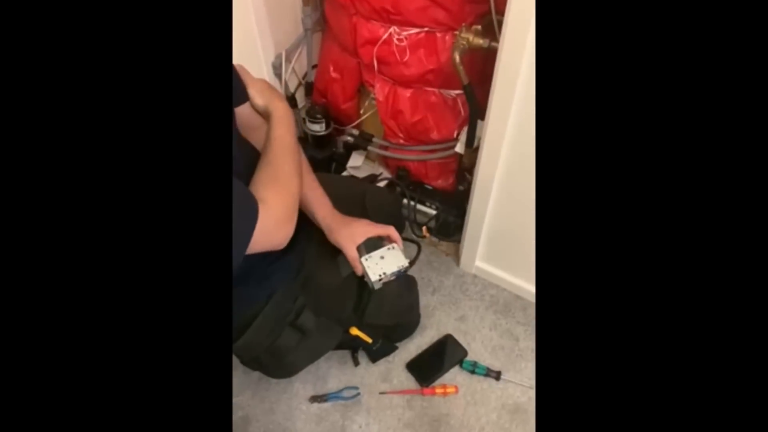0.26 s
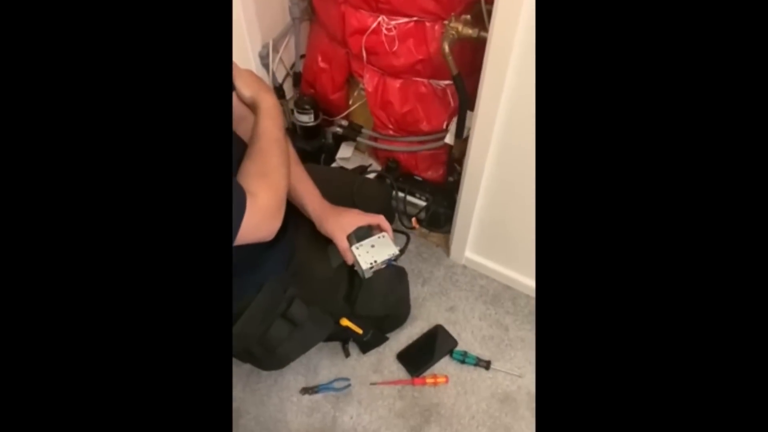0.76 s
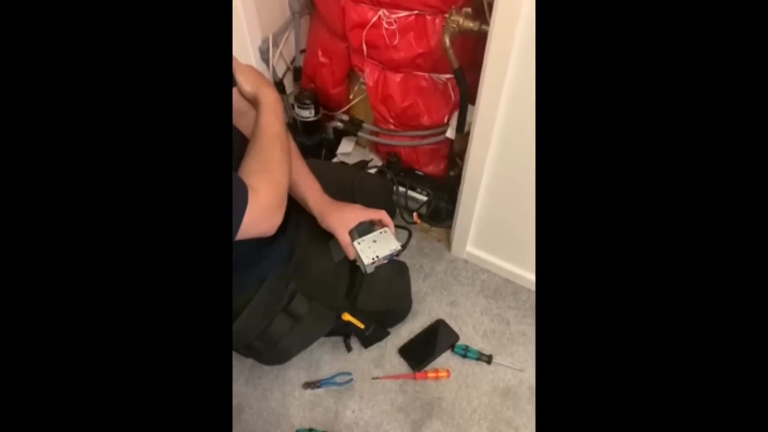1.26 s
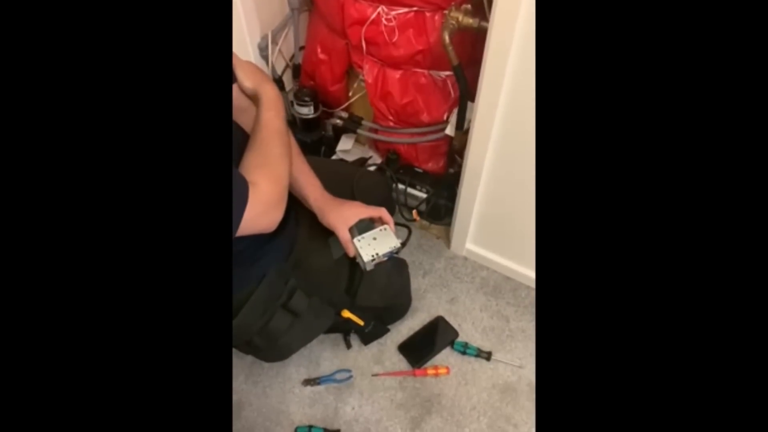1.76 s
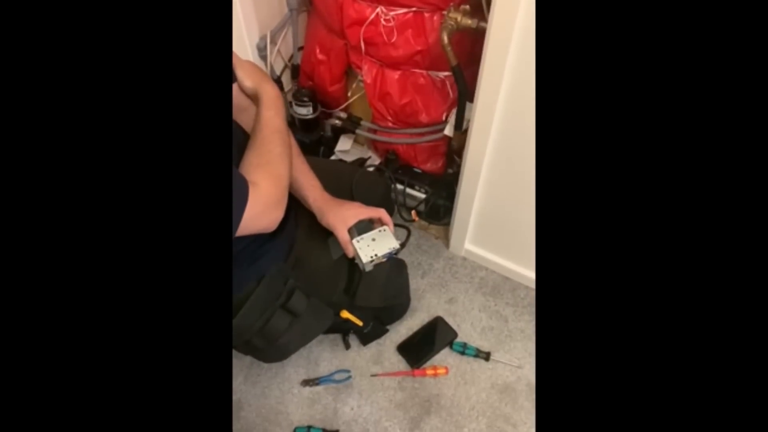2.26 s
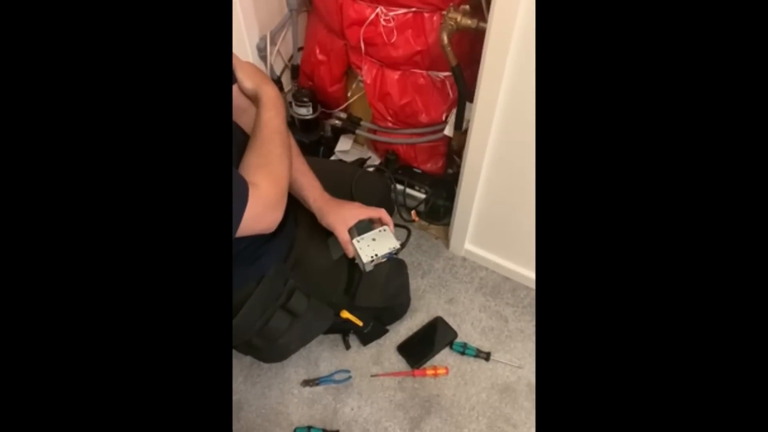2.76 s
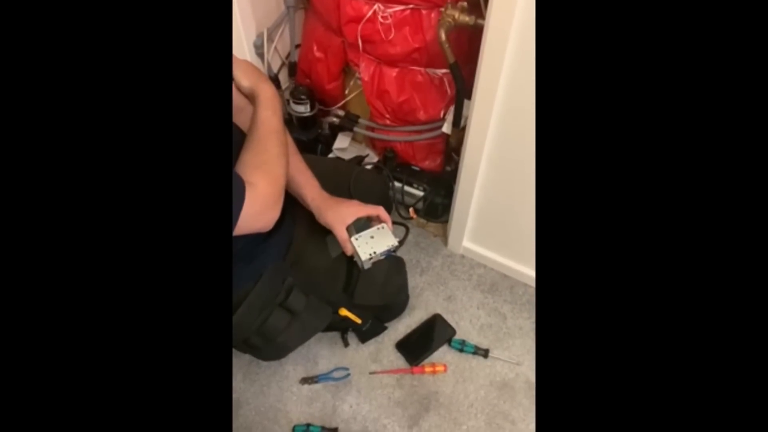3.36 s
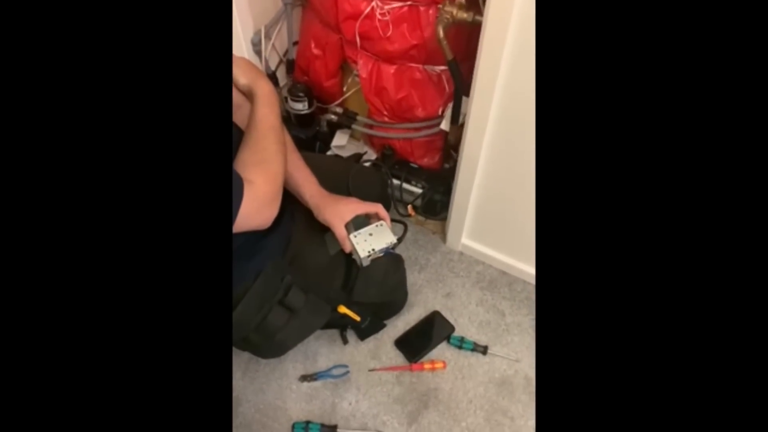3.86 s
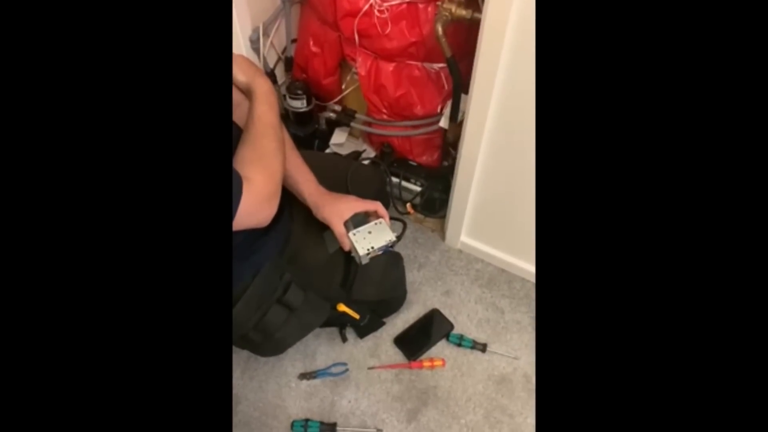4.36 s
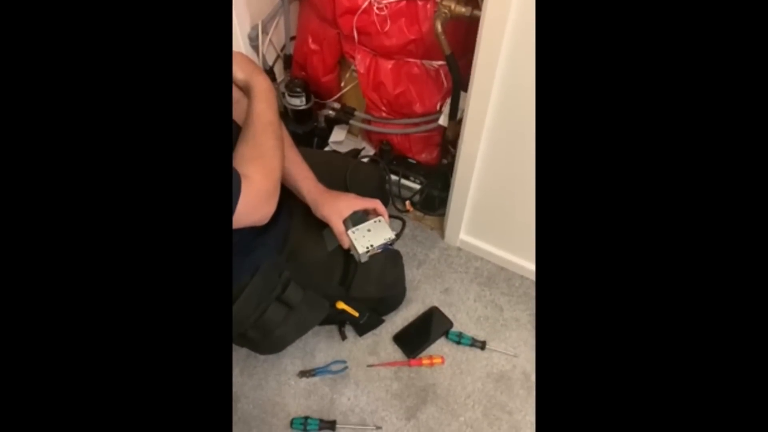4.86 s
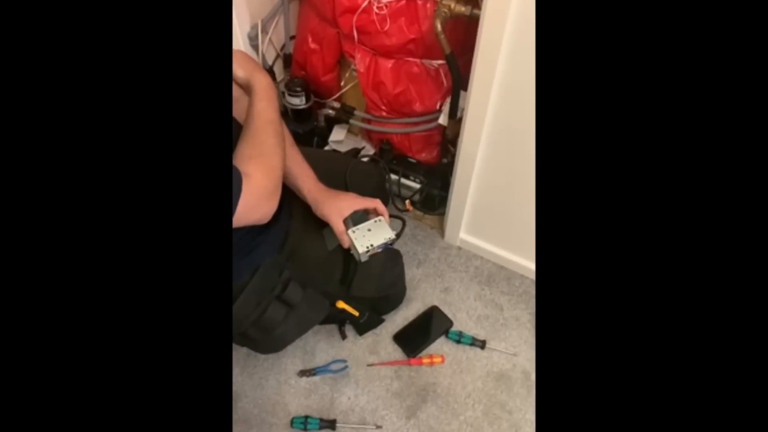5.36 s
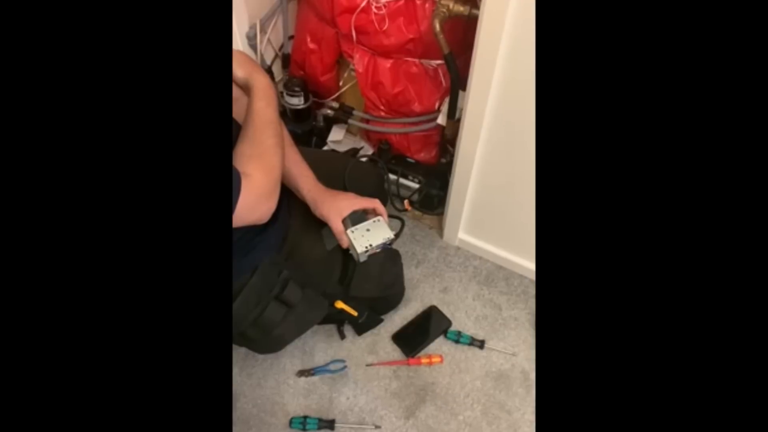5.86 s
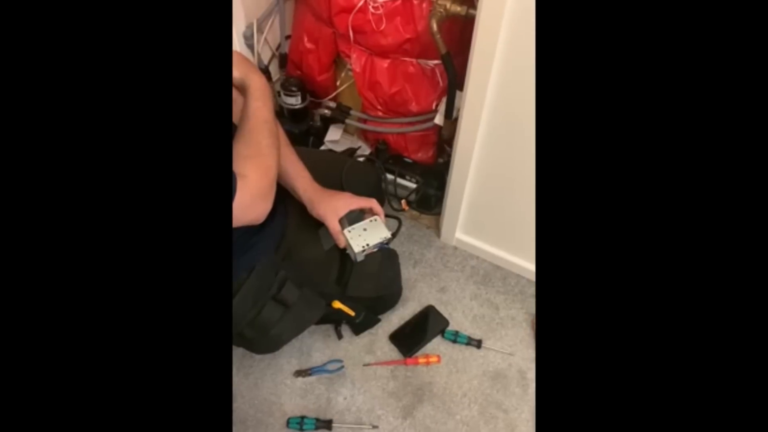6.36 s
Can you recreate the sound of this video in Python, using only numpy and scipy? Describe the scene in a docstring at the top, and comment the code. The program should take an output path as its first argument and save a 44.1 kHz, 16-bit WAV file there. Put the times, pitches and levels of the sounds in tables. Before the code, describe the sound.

Throughout about 6.7 seconds, a small faulty mains motor in a handheld valve head gives a faint, steady, buzzy whine, strongest around 2 to 3 kilohertz, with fine gear rubbing and hiss fluttering rapidly at a hundred pulses a second. Beneath it lies a soft, low indoor rumble, rising very slightly. Sharp, loud clicks come at about 0.45, 1.66, 2.88, 4.1, 5.27 and 6.52 seconds: each a tooth slipping with a millisecond-short bright crack, then a tight, hard casing ring that dies almost immediately. They are nearly alike, the last two a little quieter. Quick early reflections and a short tail of about a quarter second show a small carpeted space. Around 3.2 seconds a very soft, dull nudge of the hand on the casing is barely noticeable. Close stereo pickup, slightly dulled at the very top; the motor keeps running to the end.

```python
"""Slipping gear on a carpeted landing

A faulty motorised valve head runs in the hand, in front of an open cupboard on a carpeted landing.
Its mains motor buzzes through the gear train: steady lines plus rubbing and hiss that throb with the beat.
About every 1.2 s a worn gear jumps a tooth: a crack of friction, then the casing rings as it lands.
Early echoes and a short room tail follow each snap in stereo, over a low indoor rumble and one soft nudge."""
import sys
import numpy as np
from scipy import signal
from scipy.fft import rfft, irfft
from scipy.io import wavfile
from scipy.ndimage import uniform_filter1d

SR = 44100
rng = np.random.default_rng(int(sys.argv[2]) if len(sys.argv) > 2 else 0)


def store_wav(level_fs):
    """Save 16-bit WAV to argv[1]."""
    pcm = np.round(np.clip(np.atleast_2d(level_fs), -1, 1) * 32767)
    wavfile.write(sys.argv[1], SR, pcm.T.astype(np.int16))


N = 291170
TIME = np.arange(N) / SR
LEFT_RIGHT = np.array([[1], [-1]])   # sign of a difference signal in the two channels


def from_db(db):
    """Amplitude factor of a level in dB."""
    return 10 ** (np.asarray(db) / 20)


def rms_one(x):
    """Scale a signal to rms 1."""
    return x / np.sqrt(np.mean(x ** 2) + 1e-20)


def spectrum_hz(size):
    """Frequencies of the real spectrum of a block."""
    return np.arange(size // 2 + 1) * SR / size


def at_hz(points, hz):
    """Read a spectrum on a log-frequency axis."""
    known_hz, values = np.transpose(points)
    return np.interp(np.log(hz + 0.00076), np.log(known_hz), values)


def panned(left_db):
    """Gains of the two channels for a left-minus-right difference in dB."""
    return from_db(LEFT_RIGHT * left_db / 2)


def drift(rate):
    """Slow random wander: `rate` normal draws per second, joined by straight lines."""
    knots = rng.standard_normal(4096)
    return np.interp(TIME * rate, np.arange(len(knots)), knots)


# Left-right likeness of the air at the microphones: (frequency [Hz], correlation [-1 to 1])
LIKENESS = [(40, 1), (90, 0.99), (180, 0.92), (350, 0.49), (700, -0.67), (1500, 0.2), (3000, -0.045),
            (5500, 0.24), (9000, 0.76)]


def noise(spectrum, size):
    """Stereo noise of a given colour; mid and side are mixed to the likeness of the air; rms 1."""
    hz = spectrum_hz(size)
    mid, side = rfft(rng.standard_normal((2, size)))
    alike = np.clip(at_hz(LIKENESS, hz), -1, 1)
    both = np.sqrt(1 + alike) * mid + np.sqrt(1 - alike) * side * LEFT_RIGHT
    return rms_one(irfft(both * from_db(at_hz(spectrum, hz)), size))


# Colour of the indoor rumble: (frequency [Hz], relative density [dB per Hz])
RUMBLE = [(12, -36), (20, -22), (71, 2), (96, -5), (147, -2.5), (204, -10), (241, -6), (266, -9.5),
          (393, -15), (487, -22.5), (546, -18.5), (612, -29.5), (709, -19.5), (1000, -36), (1300, -60),
          (2200, -120)]


def indoor_rumble(start_db, rise_db_per_s):
    """Low indoor noise, growing slightly louder throughout."""
    return from_db(start_db + rise_db_per_s * TIME) * noise(RUMBLE, N)


# Surfaces near the hand: (extra travel time [s], level before the common echo gain [dB])
ECHOES = [(.0042, -24), (.0078, -23), (0.0106, -16.5), (0.0265, -32.5), (.029, -28)]
# Tail of the landing: (frequency [Hz], level before the common wet gain [dB])
TAIL = [(150, -12), (600, 1), (1000, -1), (1300, 0), (1750, -2.5), (2200, -5.5), (3600, 5), (6000, -3.5),
        (9000, -5.5), (12000, -12)]
# Decay of the tail: (frequency [Hz], time to fall 60 dB [s])
TAIL_T60 = [(150, 0.4), (1200, 0.25), (2300, 0.22), (4000, 0.26), (8000, 0.24), (12000, 0.16)]


def room(wet_db, build_s, echo_db, echo_cut_hz, size=16384):
    """Stereo response: direct path, a few early echoes, and a tail that dies band by band."""
    t, hz = TIME[:size], spectrum_hz(size)
    white = rfft(noise([(20, 0), (20000, 0)], size))
    edges = np.geomspace(100, 14000, 25)
    response = np.zeros((2, size))
    for low, high in zip(edges, edges[1:]):
        centre = np.sqrt(low * high)
        band = irfft(white * ((hz >= low) & (hz < high)), size)
        decay = np.exp(-np.log(1000) * t / at_hz(TAIL_T60, centre))
        build = 1 - np.exp(-(t / build_s) ** 2)
        share = np.sqrt(2 * (high - low) / SR / size)   # level due to the width of the band
        response += rms_one(band * decay * build) * share * from_db(wet_db + at_hz(TAIL, centre))
    for delay, db in ECHOES:
        lags = delay + rng.uniform(-0.000356, 0.00012, (2, 1))   # each arrives from its own side
        pulse = 2 * echo_cut_hz / SR * np.sinc(2 * echo_cut_hz * (t - lags))
        response += from_db(db + echo_db) * pulse
    response[:, 0] += 1   # direct path
    return response


def swell(t, rise_s):
    """Envelope of a threefold resonance: climbs to 1 in rise_s, then dies."""
    age = np.maximum(t, 0) / rise_s
    return (age * np.exp(1 - age)) ** 2


def ring(t, hz, width_hz):
    """One mode, building up and dying away; a wider resonance does both faster."""
    return swell(t, 2 / (np.pi * width_hz)) * np.sin(2 * np.pi * hz * t)


# The hand shifts on the casing: (time [s], frequency [Hz], width [Hz], envelope peak [dB])
NUDGE = [(3.225, 553, 33, -58), (3.227, 313, 34, -56.5)]


def hand_nudge():
    """Low modes ring softly, alike in both channels, as the hand shifts on the casing."""
    return sum(from_db(db) * ring(TIME - s, hz, width_hz) for s, hz, width_hz, db in NUDGE)


WIND_UP_S = 1.21   # time for strain to climb fully


def strain():
    """Load on the gear train: climbs from -.5 towards .5 as the motor winds up, and drops at each jump."""
    jump_times = [s for s, *_ in JUMPS]
    starts = np.array([jump_times[0] - WIND_UP_S] + jump_times)
    age = TIME - starts[np.searchsorted(starts[1:], TIME)]
    return np.minimum(age / WIND_UP_S, 1) - .5


def loaded_db(law):
    """Level of a motor layer under the present strain."""
    mid_db, wind_up_db = law
    return mid_db + wind_up_db * strain()


def seating_db(first_db, reseat_s):
    """After each jump the teeth settle into a new seat, with a hiss level of its own."""
    rows = [(0, first_db)]
    for s, *_, hiss_db in JUMPS:
        rows += [(s, rows[-1][1]), (s + reseat_s, hiss_db)]
    times, levels = np.transpose(rows)
    return np.interp(TIME, times, levels)


BUZZ_HZ = 100.09   # two tugs on the rotor per mains cycle
TOP_WHINE_HZ = 5000   # lines above this follow the top load law
# Motor whine: (nominal frequency, snapped to a multiple of the buzz [Hz], level before load and wander [dB])
WHINE = [(1200, -77.5), (1300, -87.5), (1400, -93), (1500, -83.5), (1600, -82), (1800, -83.5), (1900, -78),
         (2000, -73.5), (2100, -57), (2200, -75), (2300, -63.5), (2400, -61), (2500, -76), (2800, -79),
         (2900, -74), (3000, -65), (3100, -70), (3200, -70.5), (3300, -79.5), (3400, -75.5), (3800, -74.5),
         (3900, -88), (4000, -70.5), (4100, -78), (4200, -78), (4500, -96), (4600, -78), (4700, -76.5),
         (5200, -78.5), (5300, -79), (5400, -83), (5500, -83)]
# Load on the main lines: (gain at mid strain [dB], gain over a full wind-up [dB])
WHINE_LOAD = (0.27, 0.88)
# Load on the topmost lines: (gain at mid strain [dB], gain over a full wind-up [dB])
TOP_WHINE_LOAD = (4.46, -0.59)


def whine(waver_db, waver_rate, wander_db, wander_rate, side_db, left_db):
    """The rotor is tugged twice per mains cycle; the casing picks out high multiples of that beat.
    Under strain the main lines swell and the topmost fade."""
    turns = BUZZ_HZ * TIME + .002 * drift(2.76)
    lines = np.zeros((2, N))
    main_db, top_db = loaded_db(WHINE_LOAD), loaded_db(TOP_WHINE_LOAD)
    for hz, db in WHINE:
        multiple = round(hz / BUZZ_HZ)
        load_db = top_db if hz > TOP_WHINE_HZ else main_db
        line_db = db + load_db + waver_db * drift(waver_rate) + wander_db * drift(wander_rate)
        phase = 2 * np.pi * multiple * turns + rng.normal(0, 1.14)
        # standing waves in the room give each line its own lead to the left or right
        side = from_db(side_db) * np.sign(rng.normal()) * np.sin(phase)
        lines += from_db(line_db) * (np.cos(phase) + side * LEFT_RIGHT)
    return np.sqrt(2) * panned(left_db) * lines


# Colour of the gear rub: (frequency [Hz], relative density [dB per Hz])
RUB = [(700, -28), (1050, -19), (1300, -10), (1750, -11.5), (2100, -2.5), (2400, 7.5), (2650, -31),
       (3050, 1), (3600, -20), (4000, -4), (4900, -23), (5300, -7), (5900, -24), (8000, -42.5)]
# Load on the rub: (level at mid strain [dB], gain over a full wind-up [dB])
RUB_LOAD = (-60, 0.3)
# Colour of the fine hiss of the teeth: (frequency [Hz], relative density [dB per Hz])
HISS = [(4000, -17.5), (6100, -8.5), (6700, 3.5), (8700, -1), (9400, -9.5), (10900, -21), (11500, -49)]


def motor(throb_db, rub_left_db, first_hiss_db, hiss_wind_up_db, reseat_s):
    """Whine, plus rubbing and hiss of the gears that throb with each tug of the rotor."""
    rub = from_db(loaded_db(RUB_LOAD)) * panned(rub_left_db) * noise(RUB, N)
    hiss_db = seating_db(first_hiss_db, reseat_s) + hiss_wind_up_db * strain()
    hiss = from_db(hiss_db) * noise(HISS, N)
    throb = rms_one(from_db(throb_db * np.cos(2 * np.pi * BUZZ_HZ * TIME)))
    lines = whine(waver_db=1.0, waver_rate=9, wander_db=1.4, wander_rate=1.49, side_db=1, left_db=-1.5)
    return throb * (rub + hiss) + lines


# Colour of the crack of the sliding tooth: (frequency [Hz], relative density [dB per Hz])
CRACK = [(100, -22), (300, -16), (550, -17), (1000, -10), (1750, -13), (3000, 1.5), (4300, -2), (6000, 2.5),
         (8000, 2.5), (8800, 5), (9600, -2.5), (10500, 2), (11700, -11.5), (12500, -40)]


def crack(grit, rise_s):
    """A short burst of friction, evened to the colour of the tooth; rms about 1 at its top."""
    size = grit.shape[1]
    t = TIME[:size]
    envelope = np.sqrt(swell(t, rise_s))
    burst = rfft(grit * envelope)
    lumps = np.sqrt(uniform_filter1d(np.abs(burst) ** 2, size=24) + 1e-12)
    coloured = burst / lumps * from_db(at_hz(CRACK, spectrum_hz(size)))
    burst = irfft(coloured, size) * (t < 20 * rise_s)
    return rms_one(burst) * np.sqrt(np.mean(envelope ** 2))


KNOCK_BELOW_HZ = 1800   # casing modes below this follow the knock level, the rest the ring level
# Gear jumps: (time [s], overall level [dB], crack level [dB], casing ring [dB], low knock [dB],
# tooth hiss at mid strain after the gear reseats [dB])
JUMPS = [(0.4544, -0.5, -2, -1.5, -3.5, -67), (1.657, 0, -3.5, -2, 0.5, -72.5),
         (2.8814, 0, -3, -1, -3.5, -66), (4.0955, -0.5, -4, -1, 0, -65), (5.2691, -2, -1, -2, 0, -65.5),
         (6.5191, -3.5, 0.5, 0.5, 1, -65)]
# Casing modes: (nominal frequency [Hz], width [Hz], level before each jump's own gains [dB],
# left minus right [dB])
CASING = [(247, 204, -46.5, 0), (693, 680, -43.5, 8), (1251, 133, -32.5, 0.5), (1347, 223, -24, -3.5),
          (1655, 73, -44, 16), (2149, 267, -14, -4.5), (2288, 318, -10.5, -2.5), (3234, 416, -22.5, 0),
          (3550, 600, -25, -3.5), (5230, 3000, -16, 6), (6100, 730, -20.5, 4), (7350, 300, -51, -5),
          (8790, 220, -28.5, -9)]


def gear_jumps(crack_db, crack_rise_s, landing_s, variety, detune, right_lag_s, size=4096):
    """The same tooth slides off each time with a short crack, then lands and rings the casing."""
    t = TIME[:size]
    out = np.zeros((2, N + size))
    tooth = noise(CRACK, size)
    landed = t - landing_s - np.array([[0], [right_lag_s]])
    for s, db, bright_db, ring_db, knock_db, _ in JUMPS:
        grit = tooth + variety * noise(CRACK, size)
        snap = from_db(crack_db + bright_db) * crack(grit, crack_rise_s)
        for hz, width_hz, mode_db, left_db in CASING:
            jump_db = knock_db if hz < KNOCK_BELOW_HZ else ring_db
            strength = from_db(mode_db + jump_db + rng.normal(0, 0.2))
            mode_hz = hz * (1 + detune * rng.normal())
            snap += strength * panned(left_db) * ring(landed, mode_hz, width_hz)
        start = round(s * SR)
        out[:, start:start + size] += from_db(db) * snap
    return out[:, :N]


def scene():
    """The rumble, one soft nudge, the running motor and the snaps in the room."""
    rumble = indoor_rumble(start_db=-60.8, rise_db_per_s=0.22)
    response = room(wet_db=1.14, build_s=0.002, echo_db=1.0, echo_cut_hz=12000)
    running = motor(throb_db=1.5, rub_left_db=0.0, first_hiss_db=-69, hiss_wind_up_db=1.5, reseat_s=0.5)
    snaps = gear_jumps(crack_db=-18.5, crack_rise_s=0.0013, landing_s=0.0005494,
                       variety=0.56, detune=0.0047, right_lag_s=.00005)
    snaps_in_room = signal.fftconvolve(snaps, response, axes=1)[:, :N]
    return rumble + hand_nudge() + running + snaps_in_room


def record(dry):
    """A steep low-pass takes away the top above 11.9 kHz."""
    low_pass = signal.ellip(10, .3, 80, 11900, fs=SR, output="sos")   # ripple, stopband [dB], cutoff [Hz]
    return signal.sosfilt(low_pass, dry)


dry = scene()
out = record(dry)
store_wav(out)
```